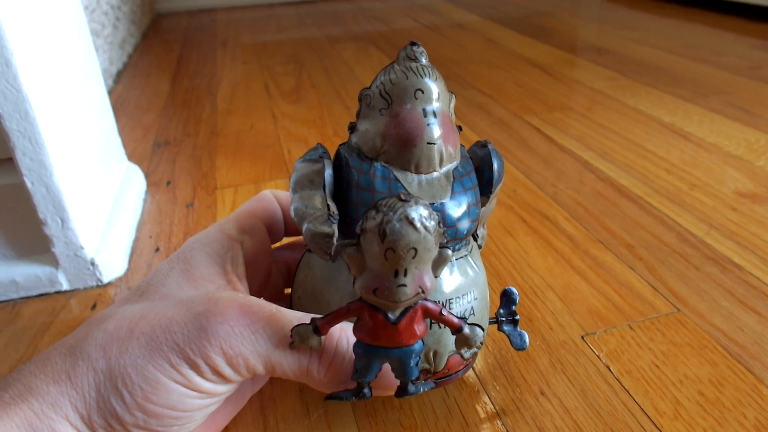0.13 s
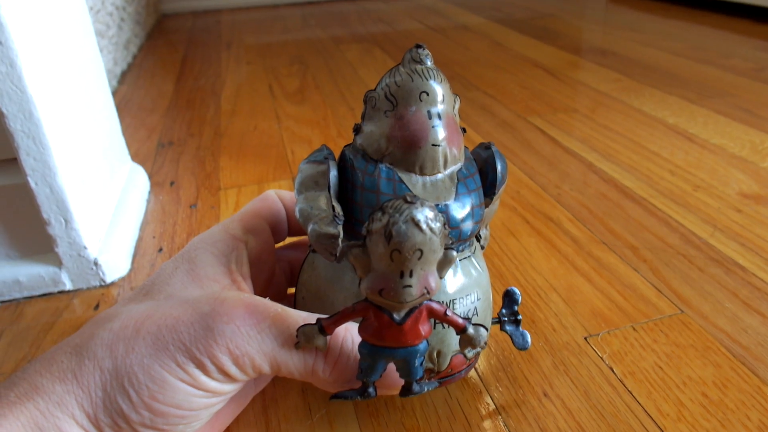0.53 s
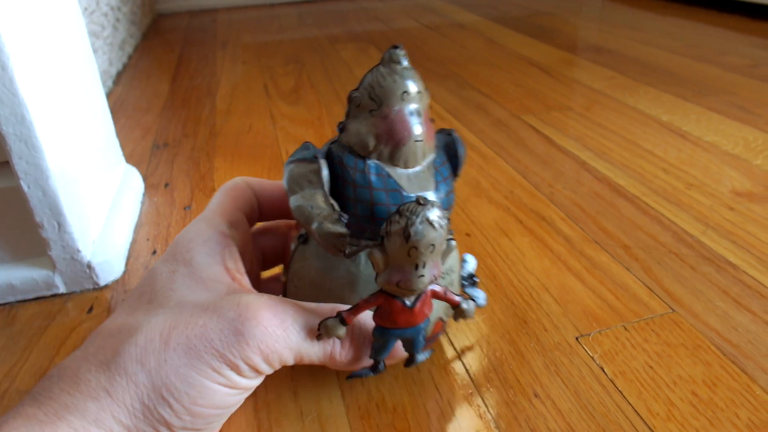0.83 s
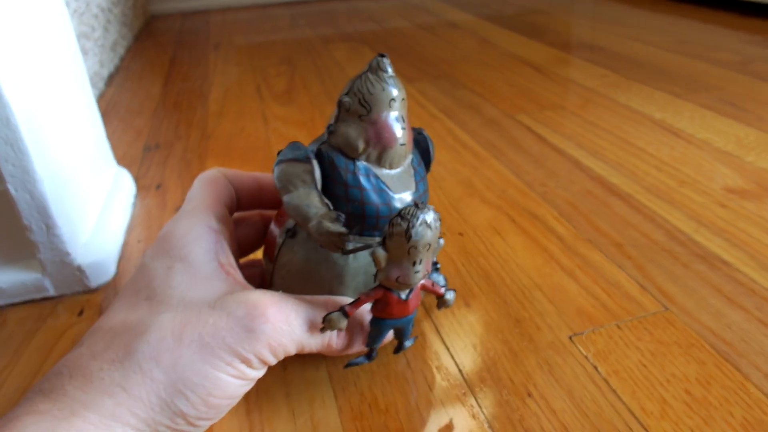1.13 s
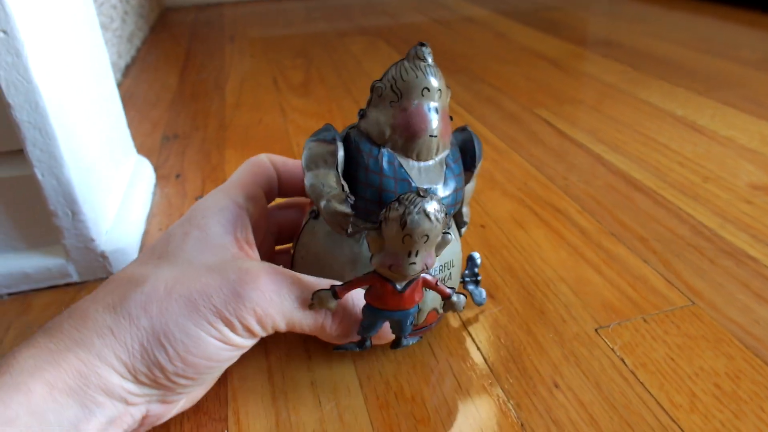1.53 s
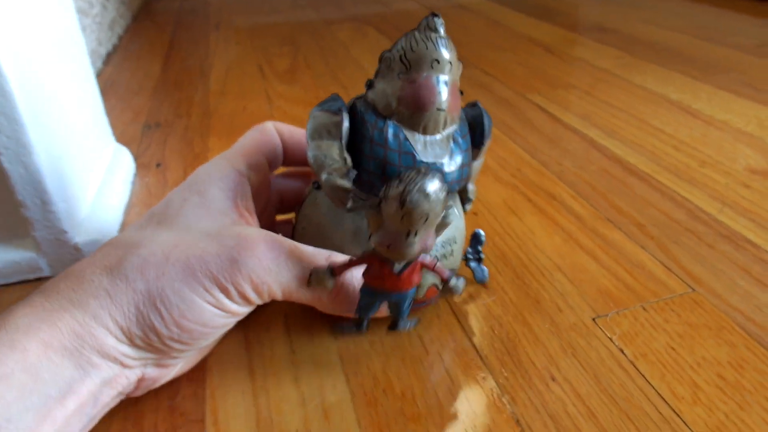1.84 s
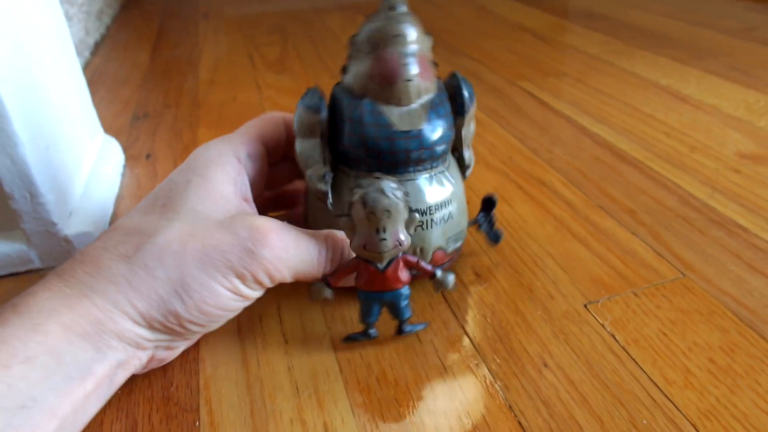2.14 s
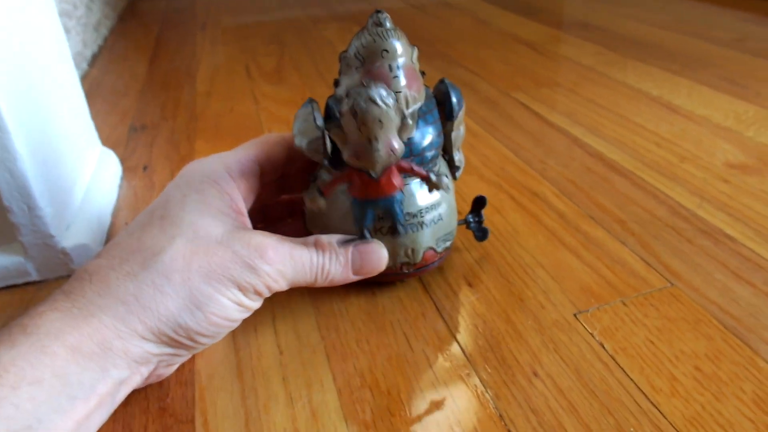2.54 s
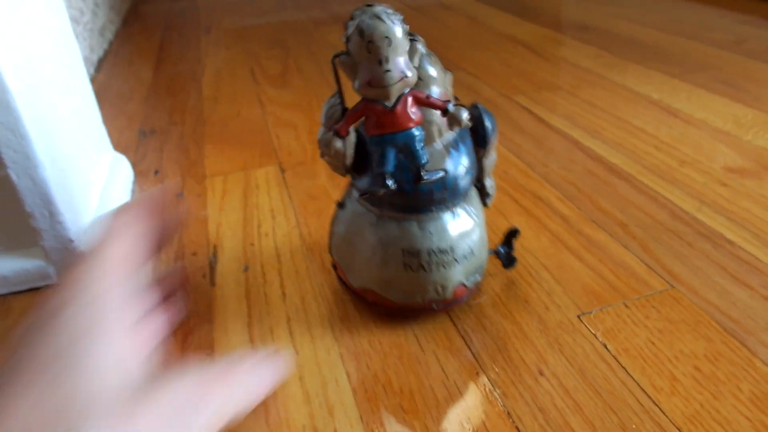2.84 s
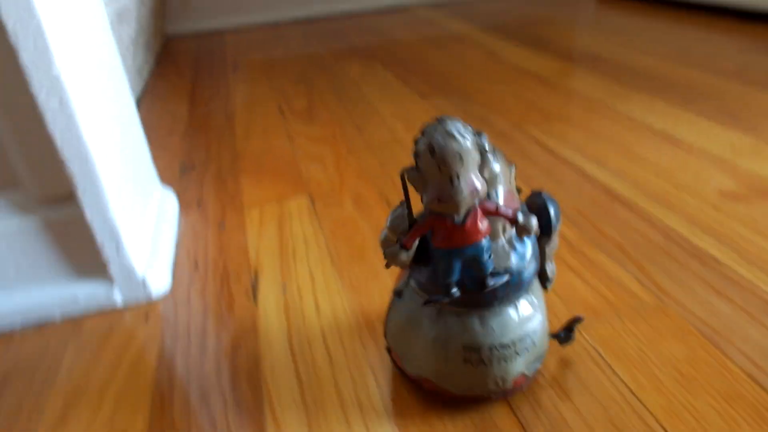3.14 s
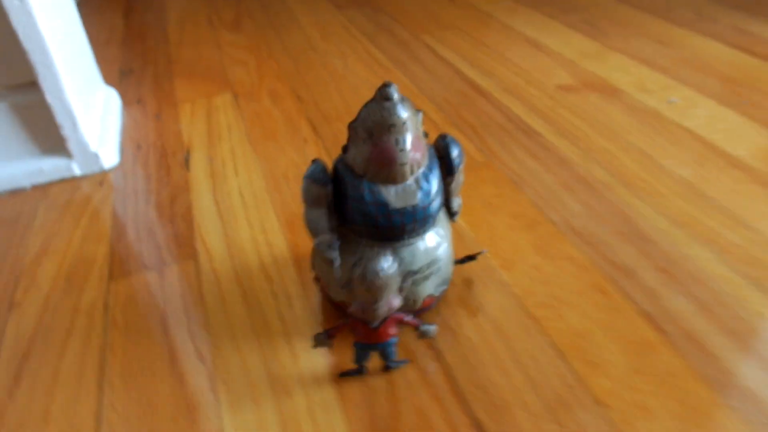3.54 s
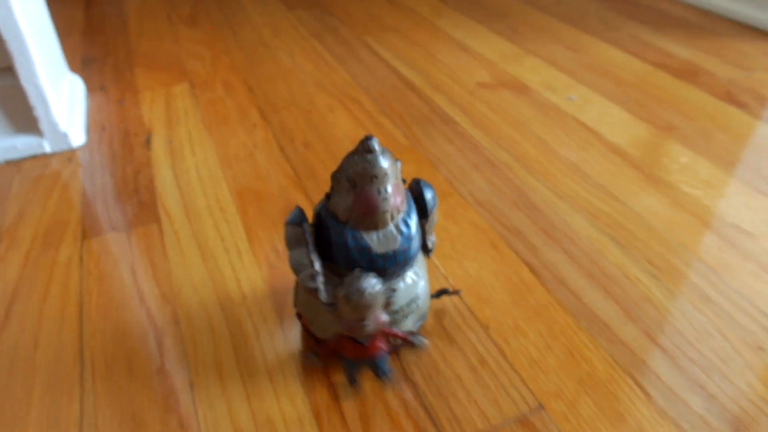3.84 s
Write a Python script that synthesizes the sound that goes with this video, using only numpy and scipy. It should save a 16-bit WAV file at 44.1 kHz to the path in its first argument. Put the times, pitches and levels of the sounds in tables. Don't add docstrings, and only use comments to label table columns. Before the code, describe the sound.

A wind-up tin toy rattles and ticks rapidly on a wooden floor after faint handling knocks

```python
import sys
import numpy as np
from scipy import signal
from scipy.fft import rfft, irfft
from scipy.io import wavfile
from scipy.ndimage import uniform_filter1d

SR = 44100
rng = np.random.default_rng(int(sys.argv[2]) if len(sys.argv) > 2 else 0)


def to_linear_factor(level_db):
    exponent = np.asarray(level_db, float) / 20
    return 10 ** exponent


def unload_audio(sound):
    columns = np.transpose(np.atleast_2d(sound))
    steps = np.round(np.clip(columns, -1, 1) * 32767)
    wavfile.write(sys.argv[1], SR, steps.astype(np.int16))


N = 176400
T = np.arange(N) / SR


def unit(x):
    return x / np.sqrt(np.mean(x ** 2))


def shape(table, n):
    hz, db = np.array(table, float).T[:2]
    bins_hz = np.maximum(np.linspace(1, SR / 2, n), 1)
    return np.interp(np.log(bins_hz), np.log(np.maximum(hz, 1)), db)


def colour(x, table):
    cepstrum = irfft(shape(table, 2049) * np.log(10) / 20)
    cepstrum[1:2048] *= 2
    cepstrum[2049:] = 0
    h = irfft(np.exp(rfft(cepstrum)))
    h = h / np.sqrt(np.sum(h ** 2))
    return signal.fftconvolve(x, h[None] if x.ndim > 1 else h)[..., :N]


def ring(modes):
    t = T[:SR // 4]
    h = np.zeros(len(t))
    for k, (hz, db, t60_s) in enumerate(modes):
        h += (-1) ** k * to_linear_factor(db) * np.sin(2 * np.pi * hz * t) * 1000. ** (-t / t60_s)
    return h / np.sqrt(np.sum(h ** 2))


def resonate(x, hz, t60_s):
    r = 1000. ** (-1 / (t60_s * SR))
    w = 2 * np.pi * hz / SR
    gain = 2 * np.sin(w) * np.sqrt(1 - r ** 2) / np.sqrt(2)
    return signal.lfilter([gain], [1, -2 * r * np.cos(w), r ** 2], x)


def pings(table, gain_db, t60_s):
    out, t = np.zeros(N + 2000), T[:2000]
    for s, db, hz in table:
        i = int(s * SR)
        decay = 1000. ** (-t / t60_s) * (1 - np.exp(-t * hz / 2))
        out[i:i + 2000] += to_linear_factor(db + gain_db) * np.sin(2 * np.pi * hz * t) * decay
    return out[:N]


def grit(spread_db):
    size_db = spread_db * np.minimum(rng.exponential(size=N), 5)
    return unit(rng.standard_normal(N) * to_linear_factor(size_db))


def walk(rate_hz):
    k = int(SR / rate_hz)
    steps = np.repeat(rng.standard_normal(N // k + 1), k)
    return 1.3 * uniform_filter1d(uniform_filter1d(steps, k), k)[:N]


def bursts(times_s, dbs, rise_s, falls_s):
    env = np.zeros(N)
    for s, db, fall_s in zip(times_s, dbs, falls_s):
        i = int(s * SR)
        t = T[:min(N - i, 3000)]
        env[i:i + len(t)] += to_linear_factor(db) * (1 - np.exp(-t / rise_s)) * np.exp(-t / fall_s)
    return env


def place(mid, side):
    # f/Hz, left minus right/dB
    lean_table = [(100, -3), (500, -3), (2500, -9.5), (6000, -6), (12000, -5.5)]
    lean_db = shape(lean_table, N // 2 + 1) / 2
    return irfft(rfft(np.array([mid + side, mid - side])) * to_linear_factor(np.array([lean_db, -lean_db])), N)


def clockwork():
    s, db, thump_db = escapement_blows()
    ticks = ticks_and_tocks(s, db)
    grind, wheels = gear_train()
    tin = tin_shell()
    mid_shake, own_shake = [ticks * grit(1.25) + grind * grit(2) for _ in range(2)]
    # f/Hz, level/dB
    tin_side = [(700, -31), (1300, -13), (4400, -5.5), (15000, 2)]
    side = tin(.5 * mid_shake + own_shake)
    side = irfft(rfft(side) * to_linear_factor(shape(tin_side, N // 2 + 1)), N)
    thumps = bursts(s, db + thump_db + 1, 0.00078, np.full(len(s), 0.0036))
    clear = plate_pings()
    mid = tin(mid_shake) + floor_boards(thumps + wheels) + clear + shell_rocking()
    return place(mid, side + 0.18 * np.roll(clear, 5))


def escapement_blows():
    # t/s, peak/dB, floor thump/dB re tick
    held_then_let_go = [(1.8666, -12.5, -9), (1.8933, -11, -20), (1.9146, -13.5, -42), (1.94, -11.5, -29),
                        (1.9563, -16.5, -26), (1.9844, -17, -3.5), (2.003, -14, -21), (2.0294, -11.5, -8.5),
                        (2.0467, -16.5, -13), (2.0728, -12, -13), (2.09, -14.5, -11), (2.112, -16, -11),
                        (2.136, -17.5, -1.5), (2.1677, -12.5, -7), (2.1873, -17, -3), (2.216, -21.5, 1),
                        (2.233, -12, -12), (2.2449, -12, -29), (2.2694, -14, -20), (2.3224, -15.5, -5.5),
                        (2.361, -22, -23), (2.3735, -15, -18), (2.4192, -29, 1), (2.4474, -16.5, 0),
                        (2.4846, -11, -13.5), (2.5314, -14.5, -9), (2.5555, -12.5, -14), (2.5945, -12.5, -3),
                        (2.6233, -13.5, -13), (2.6599, -17.5, -4), (2.6872, -13, -29), (2.7189, -10, -27),
              (2.7412, -13, -30), (2.768, -12.5, -11), (2.7884, -13, -19), (2.8202, -14, -14),
              (2.8446, -13.5, -15), (2.8723, -14.5, -9.5), (2.8942, -18, -15), (2.9208, -13.5, -3.5),
              (2.9408, -16.5, -8), (2.97, -13.5, -4.5), (2.9929, -12.5, -12), (3.019, -14, -5),
              (3.038, -15.5, -16), (3.0607, -16.5, -7.5), (3.0794, -16, -38), (3.1048, -14.5, -14),
              (3.124, -15, -30), (3.1484, -14, -24), (3.168, -16, -9), (3.1934, -16, -9),
              (3.2135, -14, -29), (3.2425, -11.5, -17), (3.263, -17.5, -30), (3.2856, -13.5, -21),
              (3.306, -13.5, -16), (3.328, -14, -31)]
    # t/s, peak/dB
    away = [(3.343, -11.5), (3.367, -17), (3.3885, -12.5), (3.411, -15.5), (3.4243, -13.5), (3.4454, -15),
            (3.465, -15), (3.488, -15), (3.5028, -17.5), (3.5282, -14.5), (3.548, -16), (3.5719, -12.5),
            (3.586, -16.5), (3.613, -13.5), (3.6321, -15.5), (3.658, -12.5), (3.674, -21), (3.7005, -13),
            (3.717, -19.5), (3.7397, -23.5), (3.7601, -14.5), (3.784, -13), (3.8042, -17), (3.8341, -15.5),
            (3.856, -16.5), (3.88, -17.5), (3.9, -19), (3.9312, -12.5), (3.9495, -17), (3.9736, -12)]
    away_thump_db = -16
    return np.array(held_then_let_go + [(*row, away_thump_db) for row in away], float).T


def ticks_and_tocks(s, db):
    tick_db, tock_db, rise_s, tick_fall_s, tock_fall_s = 6.5, -2.5, 0.00078, 0.0014, 0.0033
    scrape_db, scrape_s, stall_s = -6.5, 0.0026, 0.066
    before_s, after_s = np.diff(s, prepend=0), np.diff(s, append=T[-1])
    tock = (before_s > after_s) & (before_s < stall_s)
    blows = bursts(s, db + np.where(tock, tock_db, tick_db), rise_s, np.where(tock, tock_fall_s, tick_fall_s))
    slide_db = db + scrape_db + np.where(tock, tock_db, -7)
    scrapes = bursts(T[-1] - s[1:], slide_db[1:], rise_s, np.full(len(s) - 1, scrape_s))[::-1]
    return blows + scrapes


def gear_train():
    # t/s, grind level/dB, wheel rumble level/dB
    gears = [(1.858, -31.5, -61), (2.0, -30.5, -45), (2.26, -31, -38), (2.31, -35.5, -42.5),
             (2.37, -32.5, -53), (2.43, -40.5, -44), (2.5, -33.5, -35.5), (2.6, -31.5, -34.5),
             (2.9, -32.5, -35), (3.1, -29.5, -35), (3.5, -30.5, -38.5), (4.0, -30.5, -48.5)]
    s, grind_db, wheel_db = np.array(gears, float).T
    on = T > s[0]
    grind = on * to_linear_factor(np.interp(T, s, grind_db) + 0.5 + 2 * walk(120))
    wheels = on * to_linear_factor(np.interp(T, s, wheel_db) + 2 * walk(60))
    return grind, wheels


def tin_shell():
    # f/Hz, level/dB
    tin_colour = [(600, -54), (950, -3.5), (1220, -3.5), (1400, -9), (1900, -6.5), (2900, 0), (3900, -7.5),
                  (15500, -14)]
    # f/Hz, level/dB
    shell_modes = [(2050, -9), (2250, -.5), (2450, -5), (2700, -7), (2895, -1), (2975, -2), (3340, -7),
                   (3600, -11), (4220, -11)]
    # f/Hz, level held/dB, level free/dB
    belly_modes = [(915, -32, -25), (1150, -19, -27), (1242, -12, -22), (1720, -25, -26)]
    shell_db, shell_t60_s, belly_t60_s = -17.5, .04, .065
    sway_db, sway_hz = 3.5, 40
    modes = [(hz, db + shell_db, shell_t60_s) for hz, db in shell_modes]
    for hz, held_db, free_db in belly_modes:
        modes.append((hz, np.interp(T, [2.6, 3.2], [held_db, free_db]), belly_t60_s))
    modes = [(hz, t60_s, to_linear_factor(db + sway_db * walk(sway_hz))) for hz, db, t60_s in modes]

    def tin(x):
        return colour(x, tin_colour) + sum(resonate(gain * x, hz, t60_s) for hz, t60_s, gain in modes)
    return tin


def floor_boards(envelope):
    # f/Hz, level/dB
    board_colour = [(90, -29), (150, -14), (273, -11), (330, 3.5), (550, 2), (1230, 3.5), (1400, -11),
                    (2600, -8.5)]
    return colour(envelope * grit(2.7), board_colour)


def plate_pings():
    # t/s, peak/dB, f/Hz
    plates = [(1.8658, -10.5, 3000), (1.8943, -34, 3290), (1.9147, -21, 3070), (1.9387, -22, 2900),
              (1.9576, -20, 2980), (2.0748, -17, 2970), (2.1651, -11, 2300), (2.3223, -11, 2880),
              (2.3747, -22, 2750), (2.448, -24, 2850), (2.5957, -23, 2840), (2.6221, -16, 2900),
              (2.6865, -23, 2880), (2.7688, -21, 2880), (2.7882, -24, 2250), (2.895, -19, 3040),
              (2.9723, -13, 2050), (2.9923, -28, 2920), (3.1245, -14.5, 2890), (3.1694, -10, 2400),
              (3.2133, -17, 2450), (3.2437, -17, 2940), (3.305, -17, 3060), (3.3879, -21, 2890),
              (3.4263, -14, 2260), (3.4477, -17, 2920), (3.4886, -14, 3100), (3.5036, -9.5, 2990),
              (3.6128, -10.5, 2930), (3.7416, -17, 3070), (3.759, -21, 2880), (3.8034, -14, 2900),
              (3.8553, -16, 2950), (3.8807, -15, 2310), (3.9316, -15, 3080), (3.9511, -12, 2840)]
    return pings(plates, -4, 0.025)


def shell_rocking():
    # t/s, peak/dB, f/Hz
    rocks = [(2.072, -33, 565), (2.111, -28, 778), (2.164, -16.5, 570), (2.177, -16, 780),
             (2.187, -17, 564), (2.211, -17, 520), (2.217, -15, 560), (2.231, -23, 520),
             (2.267, -18.5, 501), (2.32, -30, 780), (2.446, -28, 412), (2.509, -22, 533), (2.531, -15, 514),
             (2.595, -26, 620), (2.621, -32, 544), (2.766, -19, 415), (2.92, -15.5, 636), (2.94, -32, 466),
             (2.97, -16.5, 640), (3.018, -16.5, 530), (3.06, -22, 540), (3.104, -19, 324),
             (3.149, -19, 535), (3.241, -19, 331), (3.324, -27, 355), (3.57, -23.5, 620), (3.657, -25, 738)]
    return pings(rocks, 4.5, 0.019)


def handling():
    out = knocks() + rubs()
    return place(out, 0.02 * np.roll(out, 9))


def knocks():
    # t/s, peak/dB, f/Hz
    knock_table = [
        (0.402, -40, 2170),
        (.417, -50.5, 8250),
        (1.108, -39, 2100),
        (1.196, -35.5, 804),
        (1.215, -26.5, 2180),
        (1.304, -41.5, 2160),
        (1.354, -33.5, 1290),
        (1.377, -29.5, 1030),
    ]
    # f/Hz, level/dB
    knock_body = [(500, -9), (800, 8), (1100, -0.5), (2100, -4), (3300, -4.5), (5500, -13.5), (15000, -31)]
    rise_s, fall_s, ring_t60_s = 0.00041, 0.004, 0.009
    ping_below_db, tone_db = -36, -8
    out = np.zeros(N)
    for s, db, hz in knock_table:
        hit = bursts([s], [db], rise_s, [fall_s]) * grit(0.97)
        tone = signal.fftconvolve(hit, ring([(hz, 0, ring_t60_s)]))[:N]
        if db < ping_below_db:
            out += tone
        else:
            out += colour(hit, knock_body) + to_linear_factor(tone_db) * tone
    return out


def rubs():
    # start/s, length/s, level/dB, slip rate/Hz (negative: pulses inverted), centre f/Hz
    rub_table = [
        (1.151, 0.04, -41, 399, 926),
        (1.343, 0.19, -47.5, 80, 980),
        (1.535, 0.1, -44.5, 150.5, 780),
        (1.594, 0.14, -38.5, -6, 553),
        (2.132, 0.12, -33.5, 220, 660),
    ]
    ring_t60_s, slope_db_per_octave, bright_gain = .007, -7, .3
    out = np.zeros(N)
    for s, length_s, db, rate_hz, hz in rub_table:
        phase = np.cumsum(rate_hz * to_linear_factor(2 * walk(150))) / SR
        slips = np.diff(np.floor(phase), prepend=0) * to_linear_factor(1.5 * rng.standard_normal(N))
        slips = slips + .03 * rng.standard_normal(N)
        body = ring([(hz * k, slope_db_per_octave * abs(np.log2(k)), ring_t60_s) for k in (.55, .8, 1, 1.5, 2.3)])
        bright = colour(slips, [(150, -19), (350, 7.0), (1500, -1), (4500, -4.0), (9000, -34)])
        sound = unit(signal.fftconvolve(slips, body)[:N] + bright_gain * bright)
        u = np.clip((T - s) / length_s, 0, 1)
        stroke = np.sqrt(np.abs(np.sin(np.pi * u))) * (u < 1)
        out += to_linear_factor(db + 2 * walk(70)) * stroke * sound
    return out


def reverberate(near):
    tail_db, t60_s = -14.5, 0.17
    t = T[:SR // 2]
    own, shared = rng.standard_normal((2, len(t))), rng.standard_normal(len(t))
    tail = shared + signal.lfilter([1, -1], [1, -.8], own - shared)
    tail = signal.lfilter([1], [1, -.5], tail) * 1000. ** (-t / t60_s) * (t > .003)
    tail = tail / np.sqrt(np.sum(tail[0] ** 2))
    return near + to_linear_factor(tail_db) * signal.fftconvolve(near, tail, axes=1)[:, :N]


def background():
    # t/s, level/dB
    hiss_level = [
        (.05, -66.5),
        (1.0, -60),
        (1.28, -54),
        (1.62, -49.5),
        (1.85, -51),
    ]
    s, db = np.array(hiss_level).T
    creep_db = np.interp(T, s, db)
    return room_tone(creep_db - creep_db[0]) + whines() + hiss(creep_db)


def room_tone(rise_db):
    # f/Hz, level/dB
    tone_colour = [(20, -24.5), (60, -21), (200, -12), (300, -8.5), (700, -11), (2500, -19.5), (6000, -30),
                   (15500, -66)]
    level_db, rise_share = -54, .25
    rumble = signal.lfilter([.035], [1, -.985], rng.standard_normal(N))
    tone = unit(colour(rng.standard_normal((2, N)) + rumble, tone_colour))
    return tone * to_linear_factor(level_db + walk(10.3) + rise_share * rise_db)


def whines():
    # f/Hz, rms/dB
    whine_table = [(199.2, -62), (2460, -81), (8253, -92), (11041, -83), (15612, -87)]
    out = np.zeros(N)
    for hz, db in whine_table:
        t = T + 0.00023 * walk(8.95) * (hz < 1000)
        out += to_linear_factor(db + 0.7 * walk(10.6)) * np.sqrt(2) * np.sin(2 * np.pi * hz * t)
    return out


def hiss(creep_db):
    # f/Hz, level/dB
    hiss_tilt = [(300, -7.5), (7400, -20.5), (15500, -27)]
    return colour(rng.standard_normal((2, N)), hiss_tilt) * to_linear_factor(creep_db + 4)


def scene():
    high_pass = signal.butter(2, 135, "high", fs=SR, output="sos")
    near = signal.sosfilt(high_pass, clockwork() + handling())
    duck_db = -16.5 * np.interp(T, [1.86, 1.9, 2.5, 3.0], [0.063, 1, 0.75, 0.37])
    return reverberate(near) + background() * to_linear_factor(duck_db)


def band_limit(x):
    return signal.sosfilt(signal.butter(12, 17000, fs=SR, output="sos"), x)


def record(dry):
    start_s, pop_db, top_hz = 0.036, -48, 15750
    pop = bursts([start_s], [pop_db], 0.0002, [.006]) * rng.standard_normal((2, N))
    low_pass = signal.ellip(10, .2, 60, top_hz, fs=SR, output="sos")
    mix = signal.sosfilt(low_pass, (dry + pop) * (T > start_s))
    return band_limit(mix)


dry = scene()
out = record(dry)
unload_audio(out)
```